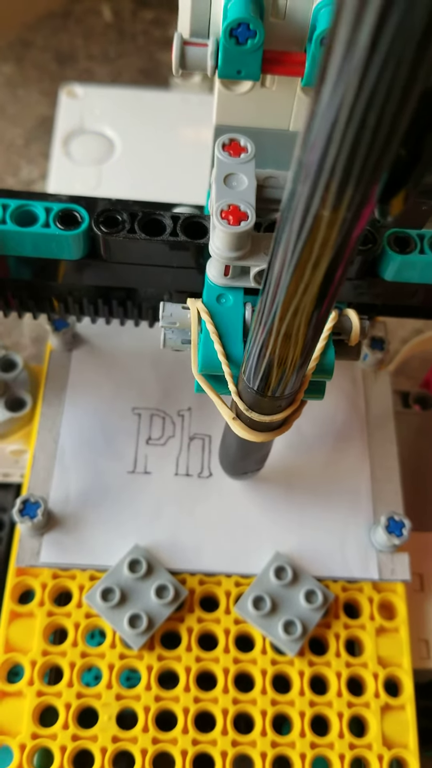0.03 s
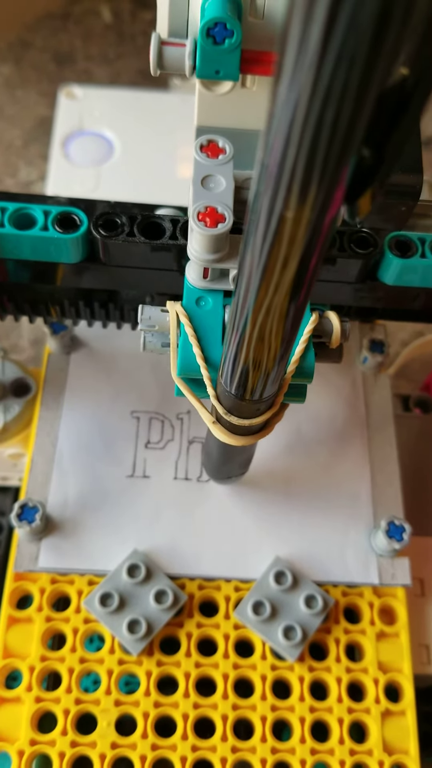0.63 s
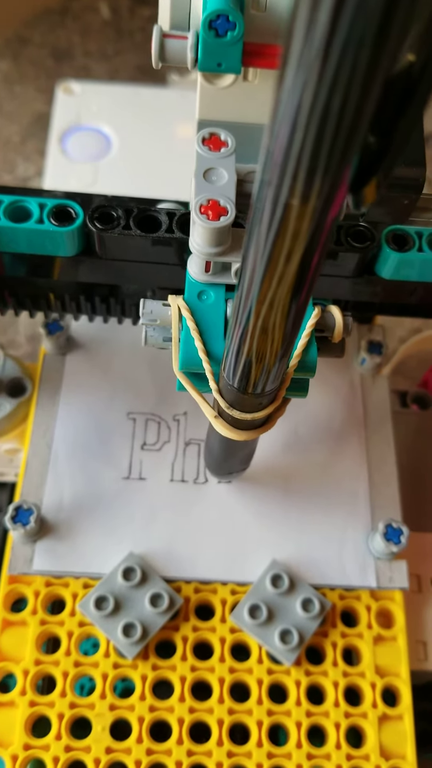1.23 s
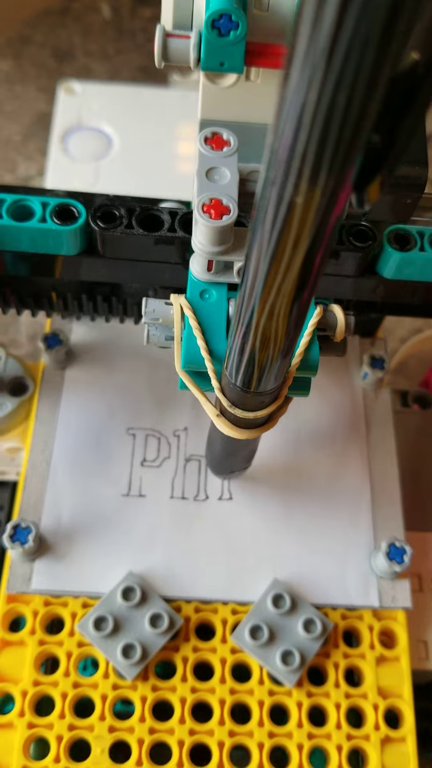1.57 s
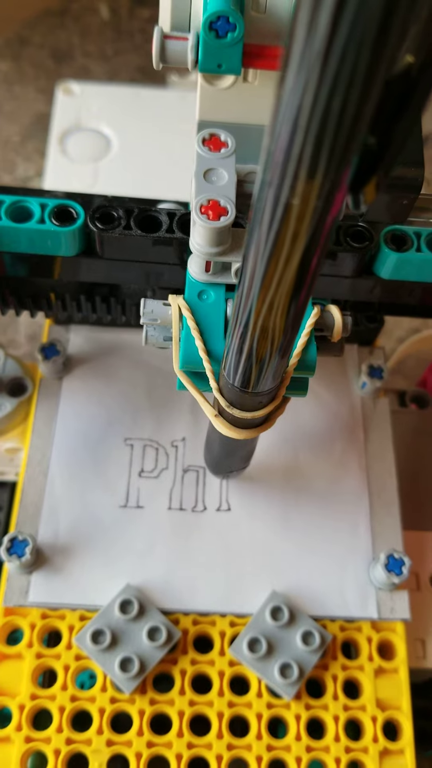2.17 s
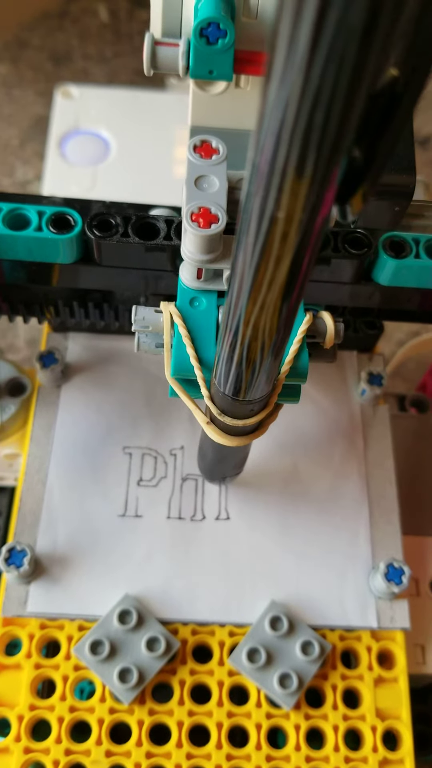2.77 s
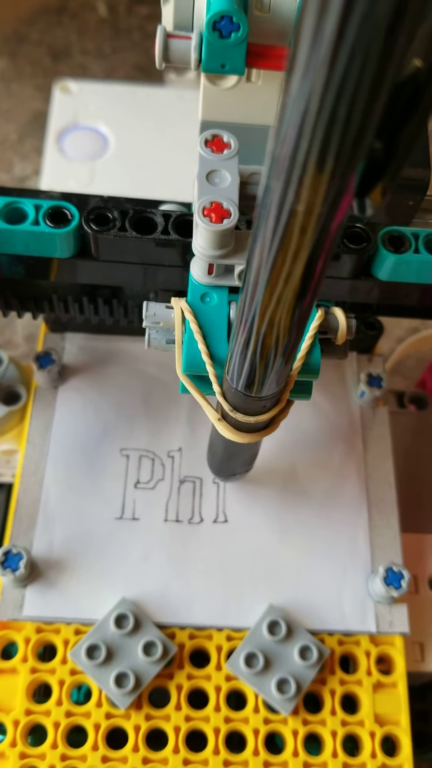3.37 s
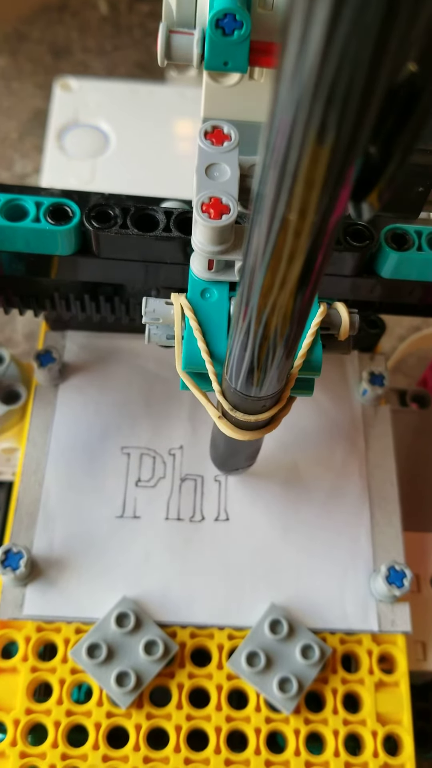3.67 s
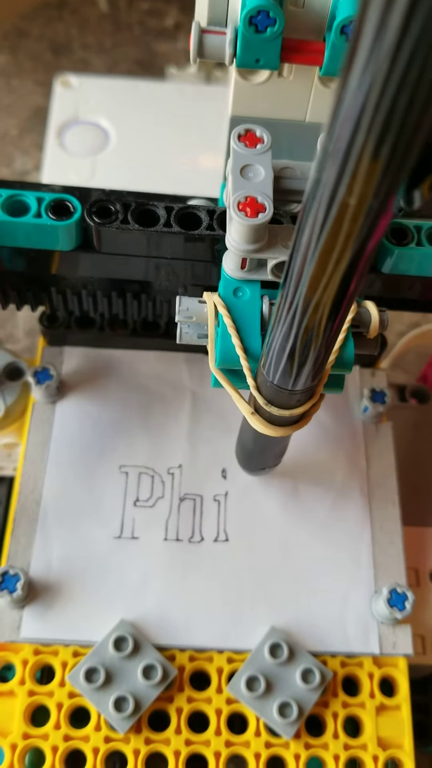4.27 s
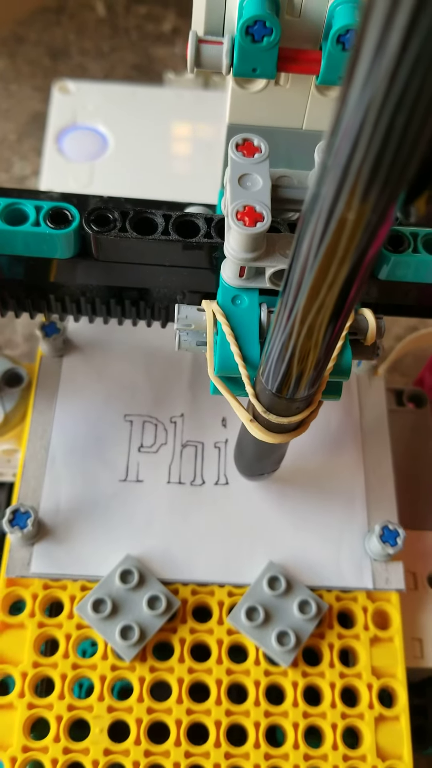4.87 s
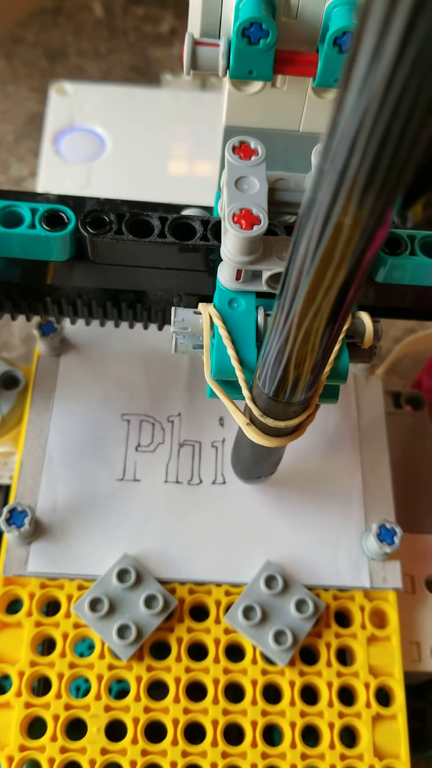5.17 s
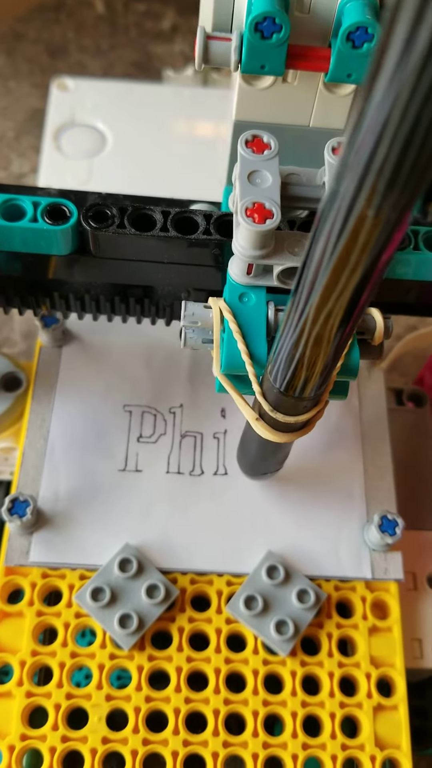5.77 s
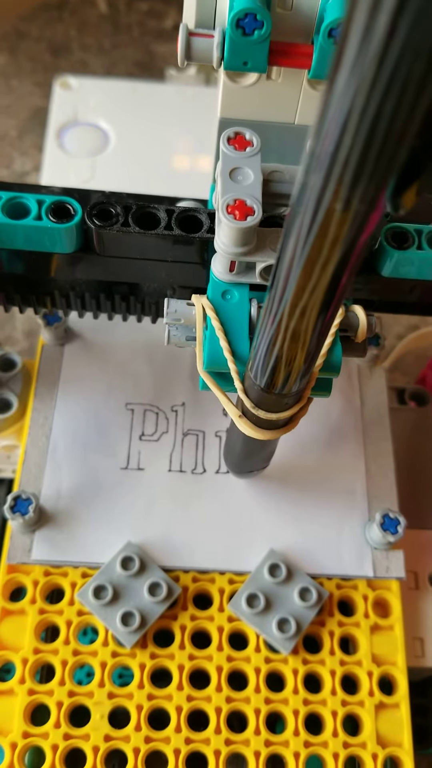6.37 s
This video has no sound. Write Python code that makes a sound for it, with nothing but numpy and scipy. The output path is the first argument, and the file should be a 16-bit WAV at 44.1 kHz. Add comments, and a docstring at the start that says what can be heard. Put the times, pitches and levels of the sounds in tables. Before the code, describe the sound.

A small pen plotter built of plastic bricks runs close by in a quiet room with low rumble, hum and soft hiss. A thin, very high whine continues throughout, swelling with each movement. At 0.1 seconds comes a quick burst of gear chatter and plastic scraping. From 0.5 to about 3.2 seconds the motors murmur faintly through slow strokes, with scattered light ticks and short rasping moves at 1.3 and 2.8 seconds. Louder quick moves follow at 3.3 and 3.7 seconds. At 3.8 seconds the carriage knocks against its stop and briefly rattles the bricks, the loudest moment. Another scrape and clicks come near 4.1 seconds. From 4.4 to 4.9 seconds the gears whir on a longer move, rising and falling in pitch, with a click. Soft strokes resume, another quick burst comes at 5.9 seconds, and one faint stroke ends it around 6.4 seconds.

```python
"""A small plotter built of plastic bricks draws letters on paper in a quiet, humming room.
Its motor drive whines thinly throughout. The pen lifter darts, gear teeth chattering and slide scraping;
from 0.5 s the geared servos creep along the strokes and loose parts tick. Quick moves bunch up after
3.3 s, and at 3.8 s the carriage knocks against its stop and rattles the bricks. The gears sing on a long
traverse at 4.4 s; slow strokes follow, the lifter darts again at 5.9 s, and one faint stroke ends it."""
import sys
import numpy as np
from scipy import signal
from scipy.fft import rfft, irfft
from scipy.io import wavfile

SR = 44100
rng = np.random.default_rng(int(sys.argv[2]) if len(sys.argv) > 2 else 0)


def put_to_file(sound):
    """Save the sound as 16-bit audio at rate SR, in the file named by the first command-line argument."""
    columns = np.atleast_2d(sound).T  # one column per channel
    safe = np.clip(columns, -1, 1)
    whole_steps = np.round(safe * 32767)
    wavfile.write(sys.argv[1], SR, whole_steps.astype(np.int16))


N = 286650
TIME, FREQS = np.arange(N) / SR, np.fft.rfftfreq(N, 1 / SR)


def from_db(db):
    """Decibels to gain."""
    return 10 ** (np.asarray(db) / 20)


def rms_one(x):
    """Scale to unit power."""
    return x / np.sqrt(np.mean(x ** 2) + 1e-20)


def over_hz(points):
    """Interpolate a table at every frequency, on a log axis."""
    hz, value = np.transpose(points)
    return np.interp(np.log(FREQS + 1e-3), np.log(hz), value)


def drift(rate_hz):
    """Smooth random wander; rms 1."""
    knots = rng.standard_normal(int(rate_hz * N / SR) + 2)
    return rms_one(np.interp(TIME * rate_hz, np.arange(len(knots)), knots))


def coloured(x, spectrum):
    """Shape a sound by a spectrum that falls away beyond its ends; rms 1."""
    ends = (1 + (spectrum[0][0] / (FREQS + 1)) ** 8) * (1 + (FREQS / spectrum[-1][0]) ** 16)
    return rms_one(irfft(rfft(x) * from_db(over_hz(spectrum)) / np.sqrt(ends), N))


def resonate(x, modes):
    """Parallel resonances with steep skirts and alternating signs; rms 1."""
    out = 0
    for k, (hz, width_hz, db) in enumerate(modes):
        b, a = signal.iirpeak(min(hz, .45 * SR), hz / (2 * width_hz), fs=SR)
        ring = signal.lfilter(b, a, signal.lfilter(b, a, x + 1e-18))
        out = out + (-1) ** k * from_db(db) * rms_one(ring)
    return rms_one(out)


def impacts(per_s, spread_db):
    """Tiny contacts of uneven force at random moments, as mid and side."""
    hits = rng.random(N) < per_s / SR
    force = from_db(spread_db * np.clip(rng.standard_normal(N), -2, 2))
    return hits * force * rng.standard_normal((2, N))


def ramp(start_s, rise_s, fall_s, longest_s=np.inf):
    """Linear rise from 0 to 1 and back; slopes capped at longest_s leave a plateau."""
    up = (TIME - start_s) / min(rise_s, longest_s)
    down = (start_s + rise_s + fall_s - TIME) / min(fall_s, longest_s)
    return np.clip(np.minimum(up, down), 0, 1)


def panned(pair, pan_db):
    """Pan a left-right pair; positive is left."""
    return pair * from_db([[pan_db / 2], [-pan_db / 2]])


# Each row: frequency in Hz, left-right likeness (clipped to just within +-1).
LIKENESS = [(60, 1.2), (130, 0.7), (290, 1.04), (640, .5), (1400, 0.09), (3100, 0.1), (6800, 0),
            (15000, -0.5)]
def spread(pair):
    """Mid and side to left and right: alike in the bass, largely unrelated in the treble."""
    mid, side = rfft(pair)
    alike = np.clip(over_hz(LIKENESS), -.99, .995)
    return irfft((np.sqrt(1 + alike) * mid + np.sqrt(1 - alike) * side * [[1], [-1]]) / np.sqrt(2), N)


# Room noise spectra. Each row: frequency in Hz, relative density in dB.
RUMBLE_SPECTRUM = [(18, -21), (34, -11), (43, -5), (56, 4.5), (72, 0.5), (90, 3), (110, -6.5), (135, -6),
                   (200, -14), (280, -18), (420, -13.5), (650, -16.5)]
HISS_SPECTRUM = [(500, -3), (900, 0.5), (2000, -3.5), (3400, -2.5), (4400, -2), (5500, 2), (7700, 2),
                 (8800, -7), (10500, -7), (12200, 6), (13500, -3), (14500, -40), (16000, -35)]
# Each row: time in seconds, hiss level in dB.
HISS_FADE = [(3.2, -66.5), (6.5, -69)]
def background(rumble_db=-63.1):
    """Low room rumble and a soft hiss that eases slowly."""
    rumble = coloured(rng.standard_normal((2, N)), RUMBLE_SPECTRUM)
    hiss = coloured(rng.standard_normal((2, N)), HISS_SPECTRUM)
    hiss_db = np.interp(TIME, *np.transpose(HISS_FADE))
    return from_db(rumble_db) * rumble + from_db(hiss_db) * hiss


# Each row: frequency in Hz, level in dB.
HUM_TONES = [(50, -58), (94, -68.5), (116, -75.5), (162, -77.5), (184, -83.5)]
def hum():
    """Room hum, slightly unsteady in level and phase."""
    out = 0
    for hz, db in HUM_TONES:
        peak = np.sqrt(2) * from_db(db + 0.59 * drift(6.1))
        out = out + peak * np.sin(2 * np.pi * hz * TIME + 0.17 * drift(3.6))
    return out


# Drive current of a quick move. Each entry, by motor: lead, rise and linger in seconds.
CURRENT_SHAPE_S = {"feed": (.05, .07, .04), "carriage": (.04, .05, .06), "lifter": (.15, .2, .22)}
def drive_whine(hz=11987, holding_db=-78, stroke_lead_s=.03, flutter_db=1.2, skirt_db=-12):
    """The switching tone, faint while the motors hold, swells with the current of each stroke and move."""
    surges = [(start - stroke_lead_s, STROKE_RISE_S, length, db) for start, length, *_, db in STROKES]
    for motor, start, rise, fall, *_, db in MOVES:
        lead, attack, linger = CURRENT_SHAPE_S[motor]
        surges.append((start - lead, attack, lead + rise + fall + linger, db))
    swells = (from_db(db) * ramp(start, rise, length - rise) ** .6 for start, rise, length, db in surges)
    level = np.sqrt(from_db(holding_db) ** 2 + sum(swell ** 2 for swell in swells))
    lag_rad = 1.35 + .6 * drift(1.5)  # short waves reach the two microphones out of step
    tones = []
    for channel in range(2):
        phase = 2 * np.pi * hz * TIME - channel * lag_rad + 0.62 * drift(27)
        tones.append(np.sin(phase) * from_db(flutter_db * drift(5.4)))
    return level * rms_one(np.array(tones) * (1 + from_db(skirt_db) * drift(170)))


# Each row: frequency in Hz, width in Hz, relative level in dB.
FRAME_MODES = [(143, 26, -7), (343, 140, -8.5), (657, 93, -1.5), (780, 87, -5), (940, 320, -11.5)]
def gear_train(groan, chatter, housing):
    """Teeth click into the housing while their load shakes the frame."""
    teeth = impacts(per_s=4200, spread_db=0.5)
    return chatter * resonate(teeth, housing) + groan * resonate(teeth, FRAME_MODES)


# Each row: frequency in Hz, width in Hz, relative level in dB.
SMALL_PART_MODES = [(3070, 440, -6.5), (6700, 700, 0), (7020, 300, -3), (7830, 150, 4), (11450, 1600, 3.5),
                    (13300, 400, 7), (14700, 1100, -6)]
def sliding(spectrum, ring_db=-9):
    """Plastic rubs on plastic in a dense stream of slips that set small parts ringing; rms 1."""
    slips = impacts(per_s=22000, spread_db=2.5) * from_db(drift(120))
    return rms_one(coloured(slips, spectrum) + from_db(ring_db) * resonate(slips, SMALL_PART_MODES))


# Gear housing modes. Each row: frequency in Hz, width in Hz, relative level in dB.
LIFTER_HOUSING = [(1210, 260, -2.5), (1510, 83, 0), (1820, 200, 0), (2246, 69, -6.5), (2520, 200, 1.5)]
FEED_HOUSING = [(1163, 130, -2), (1536, 87, -0.5), (1980, 225, 0), (2354, 67, -4.5), (2510, 150, -6.5),
                (2940, 170, -13)]
CARRIAGE_HOUSING = [(1270, 330, -2), (1600, 390, -1.5), (2360, 120, -2.7), (2700, 170, -0.52),
                    (3120, 370, -1.4)]
# Slide spectra. Each row: frequency in Hz, relative density in dB.
LIFTER_SCRAPE = [(2900, -11), (3500, -25), (4500, -11), (6000, -3), (7600, -1), (8700, -8.5),
                 (11000, -10.5), (12500, -1.5), (15700, -8.5)]
FEED_SCRAPE = [(1760, -17), (3000, -2.5), (3640, -8.5), (3930, 1), (4120, -4), (5580, -4.5), (6070, 1.5),
               (7460, -1), (10300, -8.5), (12100, -14.5), (15600, -13)]
CARRIAGE_SCRAPE = [(1880, -29), (3200, -7), (4010, -3.5), (4610, -9), (5020, -4), (5620, -3), (7430, 2),
                   (8830, -6), (10900, -6.5), (12100, -4.5), (13600, -10), (14600, -11), (15600, -10)]
# Each row: motor; start, run-up and braking in seconds; groan, chatter, scrape and whine in dB.
MOVES = [ ("lifter", 0.112, .068, .135, -66, -58, -53.5, -64.5),
         ("feed", 1.34, .072, .105, -65, -55.8, -59.5, -71),
         ("feed", 2.838, .07, .1, -58.5, -57, -57, -64.5),
         ("carriage", 3.308, .095, .118, -65.5, -53, -48.5, -64.5),
         ("feed", 3.668, .088, .14, -57, -49.5, -50.5, -63.5),
         ("carriage", 4.088, .072, .165, -66, -60, -53, -65),
         ("feed", 4.395, .245, .24, -60, -52.7, -49.2, -68.5),
         ("lifter", 5.888, .068, .14, -64.5, -57.2, -52, -64.5), ]
def darts(motor, housing, spectrum, pan_db, gear_lag_s=.008):
    """One motor's quick moves: the slide scrapes with its speed, the loose gears rasp just behind."""
    groan = chatter = scrape = 0
    for name, start_s, rise_s, fall_s, groan_db, chatter_db, scrape_db, _ in MOVES:
        if name == motor:
            speed = ramp(start_s, rise_s, fall_s)
            load = ramp(start_s + gear_lag_s, rise_s, fall_s, longest_s=.15)
            groan = groan + from_db(groan_db) * load ** .6
            chatter = chatter + from_db(chatter_db) * load
            scrape = scrape + from_db(scrape_db) * speed ** 1.4
    gears = spread(gear_train(groan, chatter, housing))
    slide = spread(scrape * sliding(spectrum))
    return gears + panned(slide, pan_db)


STROKE_RISE_S = .035
# Each row: frequency in Hz, relative density in dB.
MURMUR_SPECTRUM = [(120, -29), (200, -14.5), (253, -8.5), (286, -11.5), (406, -2), (510, -23), (637, 0.5),
                   (1000, -26), (1300, -50), (2200, -120)]
# Slow pen strokes. Each row: start and length in seconds; murmur, chatter and whine in dB.
STROKES = [ (0.51, .18, -74, -88, -71), (0.71, .13, -73, -73, -66.5), (0.82, .24, -74, -72, -69),
           (1.125, .22, -66.5, -80, -69.5), (1.305, .32, -68.5, -80, -71), (1.645, .17, -66, -69, -68),
           (1.86, .18, -68.5, -76, -66), (2.06, .17, -72, -77, -65.5), (2.28, .22, -67.5, -71, -65),
           (2.505, .19, -71.5, -73.5, -65.5), (2.68, .17, -75, -83, -66), (3.07, .16, -78, -90, -72),
           (4.955, .18, -71.5, -77, -69), (5.16, .11, -72, -79, -67.5), (5.3, .16, -67.5, -75, -71),
           (5.45, .33, -68.5, -77, -73), (6.33, .17, -72, -78, -78), ]
def creeping(pan_db=-5):
    """At drawing speed the motors only murmur, off to the right, with soft tooth clicks."""
    murmur = chatter = 0
    for start_s, length_s, murmur_db, chatter_db, _ in STROKES:
        effort = ramp(start_s, STROKE_RISE_S, length_s - STROKE_RISE_S) ** .7
        murmur = murmur + from_db(murmur_db) * effort
        chatter = chatter + from_db(chatter_db) * effort
    teeth = impacts(per_s=1200, spread_db=0.5)
    motors = spread(murmur * coloured(teeth, MURMUR_SPECTRUM))
    clicks = spread(chatter * resonate(teeth, FEED_HOUSING))
    return panned(motors, pan_db) + clicks


# Each row: start in seconds; frame, housing and small-part levels in dB; T60 in seconds.
TICKS = [(0.911, -78, -80, -49.5, .08), (0.923, -72, -71, -56, .16), (1.333, -70, -74, -45.5, .13),
         (1.653, -57.5, -68, -63.5, .11), (1.875, -61, -76, -80, 0.088), (2.26, -55.5, -70, -53.5, .15),
         (2.871, -63, -72, -77, 0.11), (4.159, -56.5, -55, -57, 0.075), (4.267, -72, -57, -71, 0.096),
         (4.755, -60, -51.5, -54, .16), (5.019, -78, -66, -65, 0.11), (5.337, -75, -71, -62.5, .1)]
def ticks(attack_s=.003):
    """Slack is taken up: each burst of chatter dies away as the loose part settles."""
    envelopes = np.zeros((3, N))
    for start_s, *levels_db, t60_s in TICKS:
        start = round(start_s * SR)
        age_s = TIME[:N - start]
        decay = from_db(-60 * np.minimum(age_s / t60_s, 10))
        envelopes[:, start:] += from_db(levels_db)[:, None] * np.minimum(age_s / attack_s, 1) * decay
    bodies = [FRAME_MODES, FEED_HOUSING, SMALL_PART_MODES]
    rings = [resonate(rng.standard_normal((2, N)), modes) for modes in bodies]
    return sum(envelope * ring for envelope, ring in zip(envelopes, rings))


# Each row: start in seconds, impulse in dB, contact time in seconds.
BLOWS = [(3.8114, -32, 0.0019), (3.825, -33.5, 0.00106), (3.8373, -21.5, .007), (3.893, -33, 0.0084)]
# Each row: frequency in Hz, gain in dB, T60 in seconds.
CHASSIS_MODES = [(45.7, -10, 0.61), (74.6, -3, 0.13), (102.6, -5, 0.13), (160, -10.5, 0.45),
                 (249, -1, 0.079), (271, 5.5, 0.13), (317.5, -8, 0.16), (403.4, -0.5, 0.15),
                 (757, 0, 0.073), (1600, -9, .06)]
def knock():
    """The carriage hits its stop and rocks: half-sine blows ring the chassis, long ones only its bass."""
    force = np.zeros(N)
    for start_s, db, contact_s in BLOWS:
        push = np.sin(np.pi * np.clip((TIME - start_s) / contact_s, 0, 1))
        force += from_db(db) * push / push.sum()
    out = 0
    for hz, db, t60_s in CHASSIS_MODES:
        radius, angle = from_db(-60 / (t60_s * SR)), 2 * np.pi * hz / SR
        feedback = [1, -2 * radius * np.cos(angle), radius * radius]
        surface_velocity = signal.lfilter([.5, 0, -.5], feedback, force + 1e-18)
        out = out + from_db(db) * surface_velocity
    return out


def shake(start_s, db, attack_s, hold_s, t60_s):
    """Envelope of shaking: builds up, holds and dies away."""
    settling = np.clip((TIME - start_s - attack_s - hold_s) / t60_s, 0, 10)
    return np.clip((TIME - start_s) / attack_s, 0, 1) * from_db(db - 60 * settling)


# Each row: frequency in Hz, relative density in dB.
BRICK_SPECTRUM = [(330, -5), (420, 3), (510, -16), (620, -7), (760, -1.5), (900, -8), (1200, -6),
                  (1600, -3), (1800, -6.5), (2400, -6.5), (2800, -12.5), (3300, -14), (4000, -11),
                  (4700, -19)]
# Each: start in seconds, level in dB, then attack, hold and T60 in seconds.
BRICK_SHAKE = (3.808, -36, .004, .026, .15)
PIN_SHAKE = (3.808, -43.3, .012, .042, .15)
def rattle(ring_db=-5):
    """The knock shakes the loose bricks; small pins sizzle and ring above them."""
    bricks = coloured(impacts(per_s=8000, spread_db=1.5), BRICK_SPECTRUM)
    sizzle = sliding(CARRIAGE_SCRAPE)
    ring = resonate(impacts(per_s=12000, spread_db=1.0), SMALL_PART_MODES)
    pins = sizzle + from_db(ring_db) * ring
    return shake(*BRICK_SHAKE) * bricks + shake(*PIN_SHAKE) * pins


# Each row: time in seconds, tooth rate in Hz.
TRAVERSE = [(4.43, 400), (4.56, 735), (4.6, 875), (4.626, 985), (4.648, 1008), (4.67, 986), (4.705, 862),
            (4.76, 780), (4.862, 400)]
# Each row: multiple of the tooth rate, relative level in dB.
GEAR_ORDERS = [(.67, -13), (0.801, -22), (.96, -5.5), (1.13, -14), (1.36, -9), (1.55, -9.5), (1.779, -6),
               (2, 1.5), (2.2, -17), (2.42, -5), (2.7, -13), (3, -10.5)]
def gear_tones(top_speed_db=-47, wobble=0.012, flutter_db=2):
    """On the long traverse the meshing teeth sing, higher and louder as the motor runs faster."""
    tooth_hz = np.interp(TIME, *np.transpose(TRAVERSE), left=0, right=0)
    cycles = np.cumsum(tooth_hz * (1 + wobble * drift(160))) / SR
    tones = 0
    for order, db in GEAR_ORDERS:
        gain = from_db(db + flutter_db * drift(45))
        tones = tones + gain * np.sin(2 * np.pi * (order * cycles + rng.random((2, 1))))
    level = from_db(top_speed_db) * (tooth_hz / tooth_hz.max()) ** 4
    return level * tones / tones[:, tooth_hz > 0].std()


def room(x, wet_db=-17, t60_s=0.38, predelay_s=.006):
    """Nearby walls add a short diffuse tail."""
    t = TIME[:SR // 2]
    tail = rng.standard_normal((2, len(t))) * from_db(-60 * t / t60_s) * (t > predelay_s)
    wet = signal.fftconvolve(x, rms_one(tail) / np.sqrt(len(t)), axes=1)[:, :N]
    return x + from_db(wet_db) * spread(wet)


def scene():
    """The plotter in its room, over rumble, hiss and hum."""
    feed = darts("feed", FEED_HOUSING, FEED_SCRAPE, pan_db=-1.2)
    carriage = darts("carriage", CARRIAGE_HOUSING, CARRIAGE_SCRAPE, pan_db=3.5)
    lifter = darts("lifter", LIFTER_HOUSING, LIFTER_SCRAPE, pan_db=-.6)
    motors = feed + carriage + lifter + creeping() + spread(gear_tones()) + drive_whine()
    contacts = spread(ticks() + rattle()) + knock()
    return room(motors + contacts) + spread(background()) + hum()


CUTOFF_HZ = 15750
# Each row: frequency in Hz, left minus right in dB.
MIC_BALANCE = [(100, 0.5), (260, 0), (400, -5.5), (650, -6.5), (1000, -4), (1500, -1), (2300, 3.5),
               (3600, 1.5), (4600, 5.5), (6000, 3), (7700, 1), (9200, 4), (12000, 2.5), (15000, 5)]
def record(dry):
    """Each microphone has its own colour; the top is cut steeply."""
    heard = irfft(rfft(dry) * from_db(over_hz(MIC_BALANCE) * [[.5], [-.5]]), N)
    return signal.sosfilt(signal.ellip(12, .1, 80, CUTOFF_HZ, fs=SR, output="sos"), heard)


dry = scene()
out = record(dry)
put_to_file(out)
```